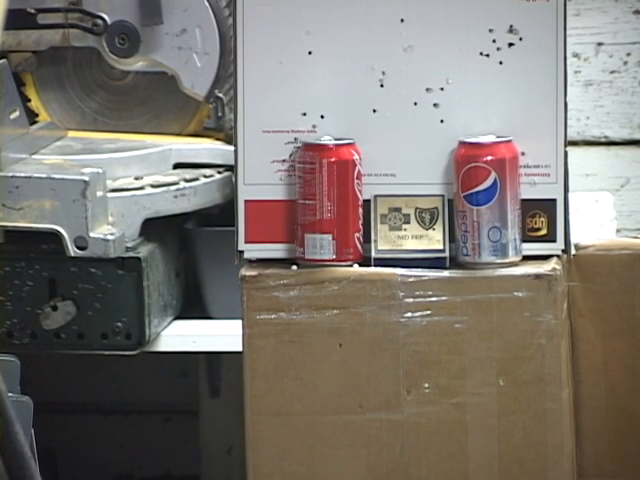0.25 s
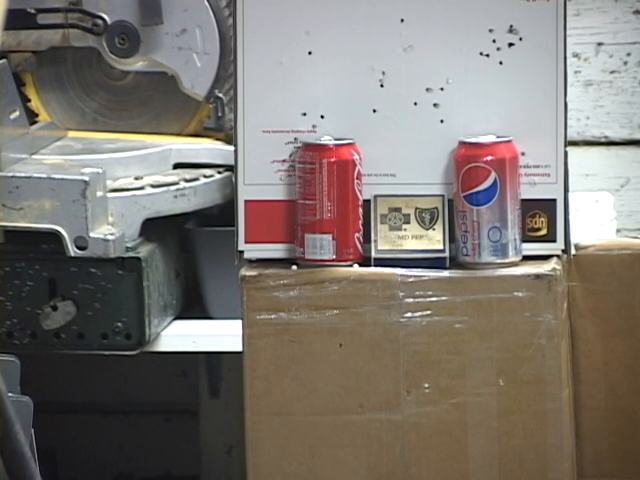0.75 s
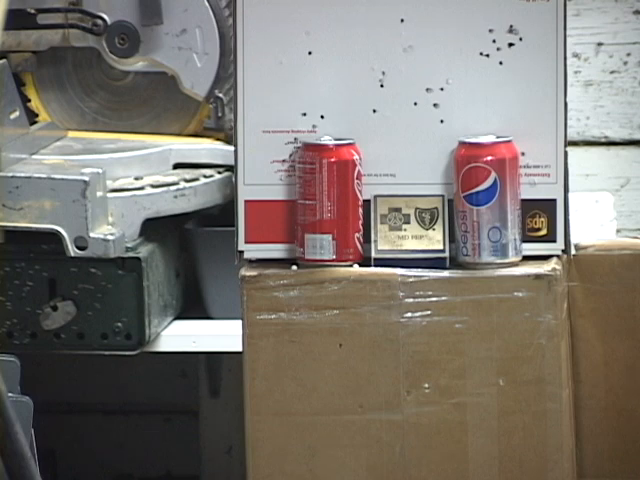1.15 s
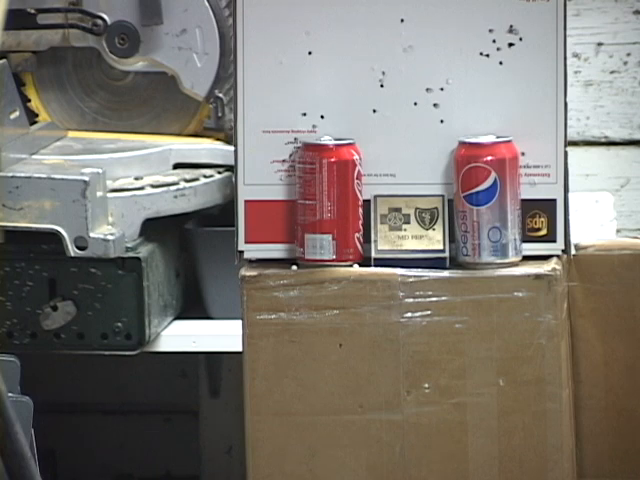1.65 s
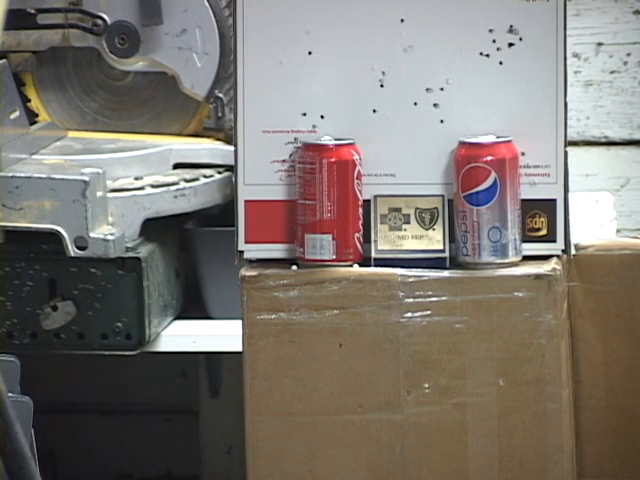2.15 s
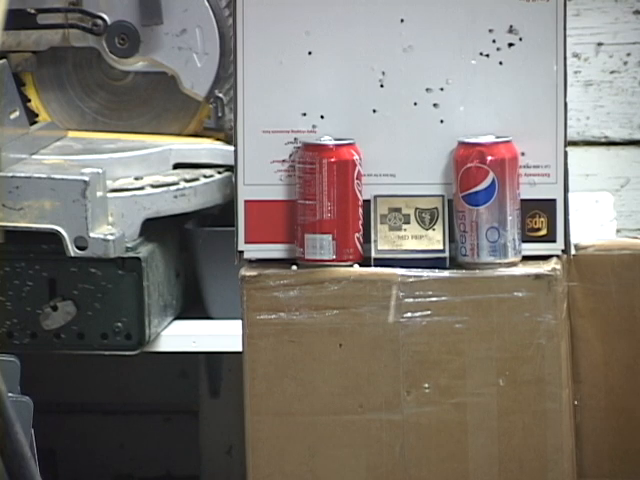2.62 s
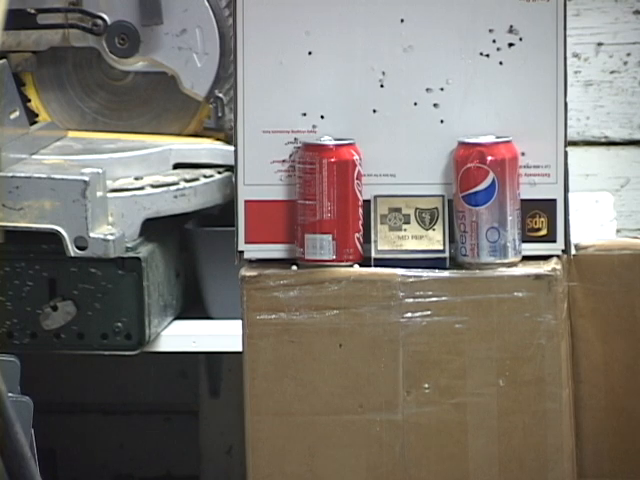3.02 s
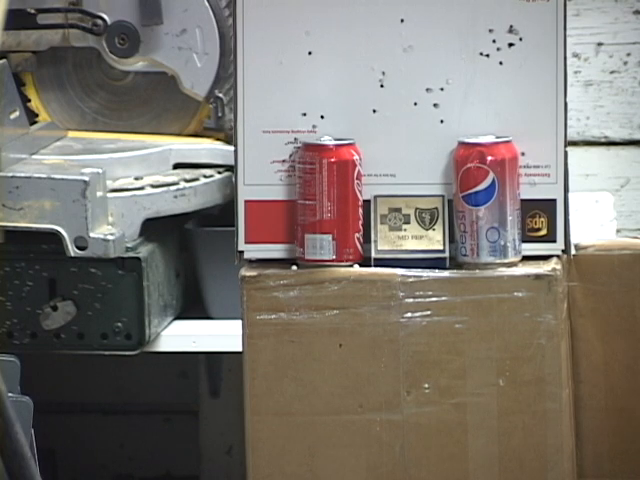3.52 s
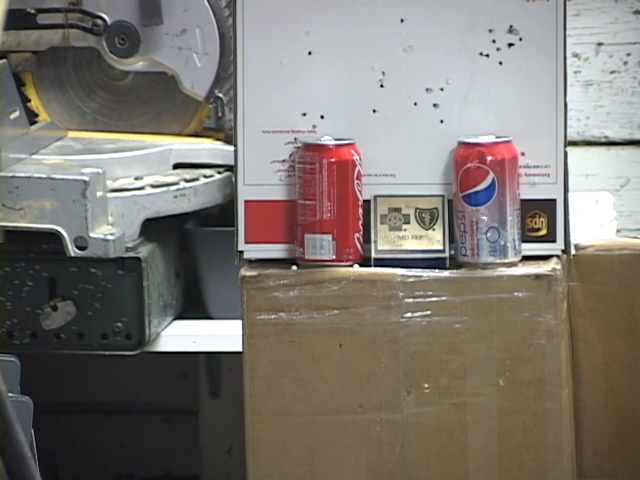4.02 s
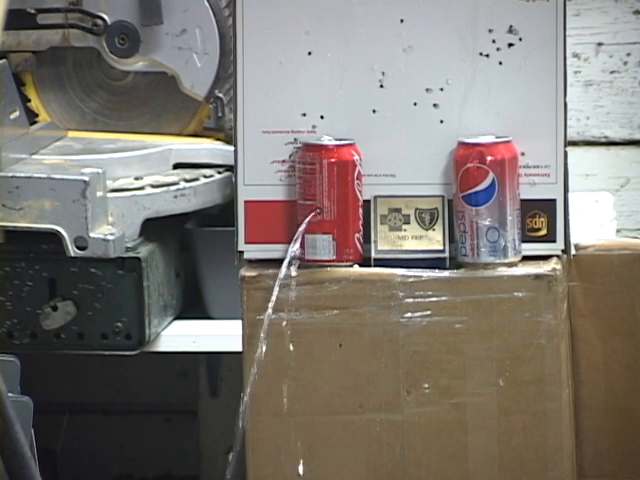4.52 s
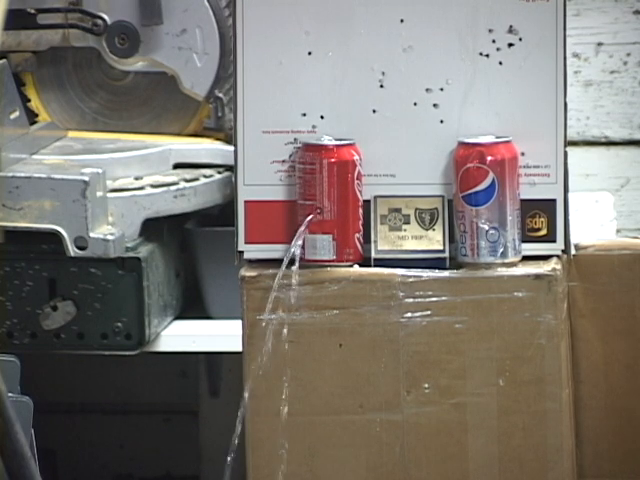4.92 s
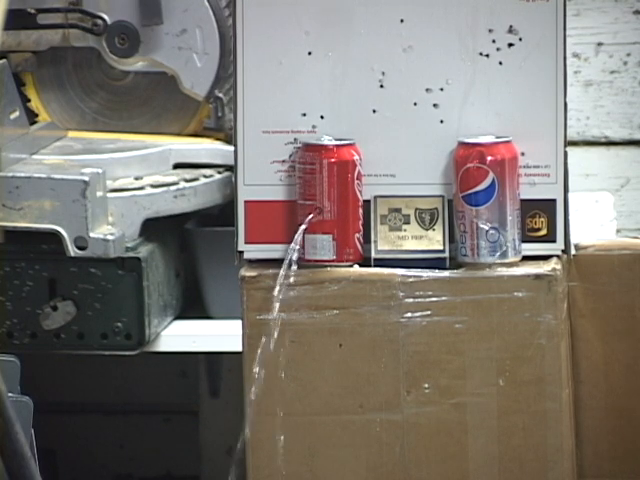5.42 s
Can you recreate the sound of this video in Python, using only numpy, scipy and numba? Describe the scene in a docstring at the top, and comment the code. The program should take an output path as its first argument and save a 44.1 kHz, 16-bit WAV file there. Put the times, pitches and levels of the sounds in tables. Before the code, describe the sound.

Two loud, sharp airsoft shots crack close to the microphone, each with an almost instant pellet hit and a slight metallic ring. After each one, the plastic pump grip slides and clacks to cock the gun. Small handling clicks and bouncing pellets fall in between, and a punctured drink can patters very softly after the second shot. A faint cricket and low hum sit under the short garage echo.

```python
"""Two sharp airsoft shots in a garage, with plastic clacks and scrapes as the pump grip slides back and forth.
In each shot the spring piston slams home, the barrel's air and nearby sheet metal ring, and the pellet
smacks the target. Hands tick on the gun, spent pellets bounce, a holed can spurts, and a cricket chirps
over a low hum. The nearby camera's limiter holds the loudest bangs level while the room dies away."""
import sys
import numpy as np
from scipy import signal
from scipy.fft import rfft, irfft, next_fast_len
from scipy.io import wavfile
from scipy.ndimage import uniform_filter1d, map_coordinates
from numba import njit

SR = 44100
rng = np.random.default_rng(int(sys.argv[2]) if len(sys.argv) > 2 else 0)


def materialize(psi):
    """Save the field psi as 16-bit PCM at rate SR to the path in sys.argv[1].

    A 1-D psi becomes a single channel; in a 2-D psi each row is a channel.
    """
    bounded = np.clip(np.atleast_2d(psi).T, -1, 1)
    quanta = np.round(bounded * 32767).astype(np.int16)
    wavfile.write(sys.argv[1], SR, quanta)


N = 249606

# Diffuse sound at the two microphones. Each row: frequency in Hz, left-right correlation.
ROOM_CORRELATION = [(60, .75), (180, .75), (550, .75), (1400, .3), (3000, -.2), (6000, 0), (15000, 0)]


def amp(db):
    return 10 ** (np.asarray(db) / 20)


def unit_rms(x):
    return x / np.sqrt(np.mean(x ** 2) + 1e-20)


def curve(points, hz):
    """Interpolates (Hz, value) points on a log axis."""
    knots_hz, values = np.transpose(points)
    return np.interp(np.log(hz + 1), np.log(knots_hz + 1), values)


def spectrum(points):
    """Gain against frequency, from (Hz, dB) points."""
    return lambda hz: amp(curve(points, hz))


def hump(centre_hz, width_oct):
    """Gaussian gain on a log frequency axis."""
    return lambda hz: np.exp(-.5 * (np.log2((hz + 1) / centre_hz) / max(width_oct, .15)) ** 2)


def uneven(colour, ripple_db=2.5):
    """Random humps about a kilohertz wide: no two knocks land alike."""
    knots = rng.standard_normal(40)
    return lambda hz: colour(hz) * amp(ripple_db * map_coordinates(knots, [hz / 700]))


def filtered(x, response):
    size = next_fast_len(x.shape[-1] + 4096)
    hz = np.fft.rfftfreq(size, 1 / SR)
    return irfft(rfft(x, size) * response(hz), size)[..., :x.shape[-1]]


def add(out, start_s, x):
    part = out[:, round(start_s * SR):][:, :x.shape[1]]
    part += x[:, :part.shape[1]]


def stereo_noise(size, correlation, colour):
    """Coloured noise with a given left-right correlation."""
    def mid_side_gain(hz):
        angle = np.arccos(np.clip(curve(correlation, hz), -1, 1)) / 2
        return colour(hz) * [np.cos(angle), np.sin(angle)]
    mid, side = filtered(rng.standard_normal((2, size)), mid_side_gain)
    return np.array([mid + side, mid - side])


def room_tail(colour):
    """Garage echoes, duller on top: each band dies at its own rate, over a weak slow tail."""
    # Room decay. Each row: frequency in Hz, T60 in seconds, share of the slow tail in dB.
    decay = [(100, 0.069, -20.5), (596, 0.23, -28.5), (1350, 0.24, -31), (5000, 0.23, -57),
             (12600, 0.21, -55)]
    slow_t60_s, build_s = 1, .0027
    noise = stereo_noise(SR * 3 // 5, ROOM_CORRELATION, lambda hz: colour(hz) / (1 + (hz / 13000) ** 4))
    hz, t, bands = signal.stft(noise, SR, nperseg=256)
    t60_s, slow_db = (curve(np.array(decay)[:, [0, k]], hz)[:, None] for k in (1, 2))
    envelope = amp(-60 * t / t60_s) + amp(slow_db - 60 * t / slow_t60_s)
    tail = signal.istft(bands * envelope, SR, nperseg=256)[1]
    tail *= 1 - np.exp(-np.arange(tail.shape[1]) / SR / build_s)  # echoes thicken
    return amp([[.6], [-.6]]) * tail / np.sqrt(np.sum(tail ** 2) / 2)


def direct(x, pan, lag_samples=5):
    """Straight path, later on the right. Positive pan is left; the camera body shades treble more."""
    both = np.array([np.pad(x, (0, lag_samples)), np.pad(x, (lag_samples, 0))])
    return filtered(both, lambda hz: amp(np.array([[.5], [-.5]]) * pan * (1.82 + hz / 14000)))


def in_garage(x, wet_db, pan=0):
    """A lasting sound, direct and through the room."""
    out = amp(wet_db) * signal.fftconvolve(x[None], room_tail(np.ones_like), axes=1)
    add(out, 0, direct(x, pan))
    return out


def strike(colour, rise_s, t60_s, wet_db, pan=0):
    """A blow: milliseconds of noise, and the room's answer in the same colour."""
    t = np.arange(SR // 10) / SR
    noise = unit_rms(filtered(rng.standard_normal(len(t)), colour))
    crack = noise * (1 - np.exp(-t / rise_s)) * amp(-60 * t / t60_s)
    out = amp(wet_db) * np.linalg.norm(crack) * room_tail(colour)
    add(out, 0, direct(crack, pan))
    return out


def ring(modes, attack_s, drift_cycles):
    """Damped modes of slightly random strength; phases wander by about drift_cycles in a second."""
    t = np.arange(SR) / SR
    drifts = np.cumsum(rng.standard_normal((len(modes), SR)), axis=1) * drift_cycles / np.sqrt(SR)
    out = np.zeros(SR)
    for (hz, db, t60_s), drift in zip(modes, drifts):
        envelope = amp(db + rng.normal(0, 1) - 60 * t / t60_s)
        out += envelope * np.sin(2 * np.pi * (hz * t + rng.random() + drift))
    return out * (1 - np.exp(-t / attack_s))


def hum():
    """A wavering rumble, stronger on the right, and the murmur of room air with microphone hiss."""
    # Background spectrum. Each row: frequency in Hz, relative density in dB.
    density = [(12, -34), (20, -21), (61, -2), (148, -17.5), (180, -13.5), (213, -21), (427, -22),
               (580, -27.5), (648, -27), (833, -31), (1160, -30.5), (1820, -38.5), (15500, -43.5)]
    # Its stereo image. Each row: frequency in Hz, left-right correlation.
    correlation = [(60, 0.96), (180, 0.67), (550, 0.24), (1650, 0.17), (4970, 0.047), (15000, 0.02)]
    rumble_db, air_db, split_hz = -51, -57.5, 250
    colour = spectrum(density)
    waver_db = map_coordinates(rng.standard_normal(60), [np.arange(N) * 7 / SR])
    rumble = unit_rms(stereo_noise(N, correlation, lambda hz: colour(hz) * (hz < split_hz)))
    air = unit_rms(stereo_noise(N, correlation, lambda hz: colour(hz) * (hz >= split_hz)))
    return amp(rumble_db + waver_db + np.array([[-1.3], [1.3]])) * rumble + amp(air_db) * air


def cloth():
    """Moving cloth rustles in soft swells."""
    # Each row: middle in seconds, half width in seconds, level in dB.
    swells = [(.05, 0.14, -63.5), (.3, 0.064, -59), (.6, .04, -62)]
    t = np.arange(N) / SR
    envelope = sum(amp(db) * np.exp(-.5 * ((t - mid_s) / half_s) ** 2) for mid_s, half_s, db in swells)
    return envelope * unit_rms(stereo_noise(N, ROOM_CORRELATION, hump(1600, 1.4)))


def cricket():
    """Three wing strokes a chirp, each a short tone that rises and falls a little."""
    # Each row: start in seconds, level in dB.
    chirps = [(.865, -60), (1.228, -56), (1.648, -56), (2.052, -56), (2.96, -64), (4.93, -62)]
    wing_hz, stroke_s, period_s = 4400, .034, .05
    out = np.zeros((2, N))
    t = np.arange(round(stroke_s * SR)) / SR
    for start_s, db in chirps:
        for k in range(3):
            pitch_hz = wing_hz * (1 + rng.normal(0, .012) - 110 * (t - .018) ** 2)
            tone = np.hanning(len(t)) * np.sin(2 * np.pi * np.cumsum(pitch_hz) / SR)
            add(out, start_s + period_s * k, amp(db + rng.normal(0, 1.2)) * in_garage(tone, wet_db=-15))
    return out


def can_spurt():
    """Drink spurts from the holed can: a thin patter of drops that swells, then slackens."""
    start_s, rise_s, level_db, sag_db_per_s = 4.25, .53, -54.5, 2.5
    drops = rng.standard_normal((2, N)) * (.5 + 2.5 * (rng.random(N) < .004))  # spikes on soft noise
    t = np.clip(np.arange(N) / SR - start_s, 0, None)
    flow = np.clip(t / rise_s, 0, 1) ** 2 * amp(level_db - sag_db_per_s * t)
    return flow * unit_rms(filtered(drops, hump(3000, 1.8)))


def faint_pings():
    """Single modes ring briefly."""
    # Each row: start in seconds, frequency in Hz, level in dB, T60 in seconds.
    pings = [(.535, 5700, -52, .06), (4.712, 1600, -43, .06), (4.722, 3180, -45, .08),
             (4.724, 850, -47, .13)]
    out = np.zeros((2, N))
    for start_s, *mode in pings:
        add(out, start_s, in_garage(ring([mode], attack_s=.005, drift_cycles=1.5), wet_db=-5))
    return out


def hollow_knock(start_s=2.861):
    """Something hollow rings once."""
    # Each row: frequency in Hz, level in dB, T60 in seconds.
    modes = [(335, -42, .16), (645, -42, .22), (760, -45, .14), (955, -46, .15), (1200, -44, .13)]
    out = np.zeros((2, N))
    add(out, start_s, in_garage(ring(modes, attack_s=.0023, drift_cycles=1.3), wet_db=-.5))
    return out


def spent_pellets():
    """Far bounces, mostly room sound; they lose their top on the way round corners."""
    # Each row: start in seconds, level in dB, centre in Hz, width in octaves.
    bounces = [(1.584, -56.5, 2000, .9), (2.645, -49.5, 5210, 0.77), (2.862, -45.5, 5000, 1),
               (2.958, -45, 4800, .6), (3.601, -34, 3610, 0.67), (3.6926, -32, 4860, 0.84),
               (4.474, -48, 5080, 0.65), (4.702, -50, 3500, .8), (4.769, -34.5, 5840, 0.68),
               (4.875, -47.5, 8070, 0.62), (4.977, -33, 6800, 1), (4.994, -32.5, 5500, .53),
               (5.088, -31.5, 3300, .5), (5.1895, -40.5, 5430, 0.27)]
    click_hz, click_db, top_hz = 9630, -15, 10600  # click: the plastic pellet's own sound
    out = np.zeros((2, N))
    for start_s, db, centre_hz, width_oct in bounces:
        surface, click = hump(centre_hz, width_oct), hump(click_hz, .2)
        colour = uneven(lambda hz: (surface(hz) + amp(click_db) * click(hz)) / (1 + (hz / top_hz) ** 8))
        add(out, start_s, amp(db) * strike(colour, rise_s=.0018, t60_s=.021, wet_db=14, pan=-6))
    return out


def handling():
    """Trigger and hands tick on the gun, each a short crack around its own pitch."""
    # Each row: start in seconds, level in dB, centre in Hz, width in octaves, pan.
    ticks = [(.049, -46.5, 1210, 0.65, 8), (0.1277, -47, 580, .55, 15), (0.379, -48.5, 2950, 0.88, 5),
             (.402, -50, 587, 0.44, 15), (.58, -53, 1900, 0.49, -4), (2.2606, -23.5, 4170, 1.65, 9.5),
             (2.861, -30.5, 720, 0.61, 1), (3.08, -34.5, 1970, 0.89, 6.5), (3.11, -29, 1300, 1.23, 3.5),
             (3.131, -31.5, 2500, 0.56, -0.5), (3.3185, -25, 1900, .8, 7.5), (3.873, -36, 2037, 1.02, 1.5),
             (3.931, -43, 1770, 0.66, 1), (3.97, -42, 1445, 0.74, 1), (4.089, -35, 2040, 0.75, 3),
             (4.45, -35.5, 547, .27, -1), (5.215, -44, 1006, 1.1, 12.5), (5.53, -30, 1490, 1, 7.5)]
    out = np.zeros((2, N))
    for start_s, db, centre_hz, width_oct, pan in ticks:
        colour = uneven(hump(centre_hz, width_oct))
        add(out, start_s, amp(db) * strike(colour, rise_s=.001, t60_s=.022, wet_db=4.5, pan=pan))
    return out


def pump_clacks(plastic):
    """Pump parts knock; the stock thuds with one low push that does not ring."""
    # Each row: start in seconds, clack level in dB, thud level in dB.
    clacks = [(3.1421, -6, -25.5), (3.148, 2.5, -18), (3.193, -1.5, -47), (3.2053, 5, -18.5),
              (3.2253, -4, -35), (3.3479, -12.5, -54), (3.4024, -10.5, -44), (3.412, 1.5, -28.5),
              (3.4188, 14, -17.5), (3.4257, 0.5, -32), (5.2857, -0.5, -27.5), (5.3681, 0.5, -17),
              (5.3746, 2, -27.5), (5.636, 1, -38), (5.6429, 12.5, -31), (5.6494, -10, -28)]
    out = np.zeros((2, N))
    t = np.arange(SR // 10) / SR
    push = np.sin(np.pi * np.clip(t / .0015, 0, .5)) * (1 - t / .015) * np.exp(-t / .0082)
    for start_s, db, thud_db in clacks:
        add(out, start_s, amp(db) * strike(uneven(plastic), rise_s=.002, t60_s=.016, wet_db=1, pan=4))
        add(out, start_s, -amp(thud_db) * direct(push, pan=5.5))
    return out


def grip_slides(plastic):
    """The grip scrapes along the tube, free up to the catch, then against the spring."""
    # Each row: start, full speed and stop in seconds; start level, full level and scrape over hiss in dB.
    strokes = [(3.121, 3.136, 3.15, -60.5, -38, 6), (3.146, 3.194, 3.207, -34.5, -28, -5),
               (3.341, 3.376, 3.418, -39, -31, -2), (5.241, 5.282, 5.288, -63, -35, 0.5),
               (5.287, 5.333, 5.368, -42, -29.5, -6), (5.53, 5.599, 5.637, -52.5, -34.5, -2)]
    # Resonances of the dull scrape. Each row: centre in Hz, width in Hz, relative gain in dB.
    resonances = [(746, 600, 8), (1293, 210, 5.5)]

    def resonant(hz):
        return sum(amp(db) * 1j * hz * width_hz / (centre_hz ** 2 - hz ** 2 + 1j * hz * width_hz)
                   for centre_hz, width_hz, db in resonances)
    out = np.zeros((2, N))
    for start_s, full_s, stop_s, start_db, full_db, scrape_db in strokes:
        t = np.arange(start_s, stop_s, 1 / SR)
        noise = rng.standard_normal((2, len(t)))
        roughness_db = 2 * unit_rms(uniform_filter1d(rng.standard_normal(len(t)), size=60))
        grit = noise * amp(roughness_db)
        hiss = unit_rms(filtered(grit[0], lambda hz: plastic(hz) * (hz > 2200)))
        scrape = amp(scrape_db) * unit_rms(filtered(grit[1], resonant))
        swell = amp(np.interp(t, [start_s, full_s], [start_db, full_db]))
        rub = swell * (hiss + scrape) * signal.windows.tukey(len(t), .2)
        add(out, start_s, in_garage(rub, wet_db=2.5, pan=4.5))
    return out


def pump(spring_start_s=3.421, spring_db=-42):
    """The plastic action clacks and slides; the cocked spring rings once."""
    # Spectrum of the plastic. Each row: frequency in Hz, relative density in dB.
    density = [(150, -24.5), (250, -16), (1360, -5.5), (2050, -4), (2320, -5.5), (2570, -3.5), (4030, -5),
               (4620, 0), (7110, -3), (8900, -4.5), (15500, -24)]
    # Each row: frequency in Hz, relative level in dB, T60 in seconds.
    spring_modes = [(780, -5, 1.1), (1130, -8, 1.0), (1351, -5, 1.0), (5373, -6, .5), (6697, -1.5, 1.0),
                    (8460, -6, .5)]
    plastic = spectrum(density)
    out = pump_clacks(plastic) + grip_slides(plastic)
    spring = ring(spring_modes, attack_s=.003, drift_cycles=.8)
    add(out, spring_start_s, amp(spring_db) * in_garage(spring, wet_db=-6))
    return out


def gunshots():
    """The piston slams home, the barrel's air rings, nearby metal shakes, then the pellet lands."""
    # Each row: start in seconds, blow level in dB, pellet flight in seconds, hit level in dB.
    shots = [(2.2918, 20, .0745, 4.5), (4.159, 18, .078, 3.5)]
    # Spectrum of blow and hit. Each row: frequency in Hz, relative density in dB.
    density = [(40, -48.5), (120, -24.5), (200, -17), (350, -13), (700, -11), (1300, -10), (2300, -4.5),
               (3500, -7), (5500, -3.5), (9000, -10.5), (12000, -15.5), (15500, -30)]
    # Air in barrel and cylinder. Each row: frequency in Hz, relative level in dB, T60 in seconds.
    barrel_modes = [(201, -15, 0.11), (495.5, -15, 0.092), (557.6, -11, 0.11), (656, -10.5, 0.15),
                    (761.5, -0.5, .09), (794.4, -6, 0.18), (854, -10, 0.16), (2335, -4.5, 0.13),
                    (5540, -10, 0.14)]
    # Sheet metal nearby, same columns.
    sheet_modes = [(526, 0, 1), (582, -2.5, 1), (815, -7.5, .55), (953, -1.5, 0.84), (1200, 2.5, 0.51),
                   (1270, -0.5, 0.92), (1733, -11, .5), (1830, -7.5, 0.465)]
    colour = spectrum(density)
    out = np.zeros((2, N))
    for start_s, db, flight_s, hit_db in shots:
        add(out, start_s, amp(db) * strike(colour, rise_s=.00011, t60_s=.02, wet_db=-.5, pan=4.5))
        barrel = ring(barrel_modes, attack_s=.0021, drift_cycles=1)
        add(out, start_s + .00291, amp(db - 8.5) * in_garage(barrel, wet_db=-21.5))
        sheet = ring(sheet_modes, attack_s=.02, drift_cycles=.95)
        add(out, start_s + .003, amp(db - 57.5) * in_garage(sheet, wet_db=-3))
        add(out, start_s + flight_s, amp(hit_db) * strike(colour, rise_s=.00048, t60_s=.01, wet_db=10.5))
    return out


def scene():
    """All sources at the two microphones."""
    return (gunshots() + pump() + handling() + spent_pellets() + hollow_knock() + faint_pings()
            + cricket() + can_spurt() + hum() + cloth())


@njit
def follow(level, attack_s, release_s):
    """The limiter's envelope follower."""
    out, held = np.empty_like(level), 0.0
    for i in range(len(level)):
        held += (level[i] - held) / (SR * (attack_s if level[i] > held else release_s))
        out[i] = held
    return out


def record(dry):
    """One limiter for both channels, whose gain swing leaks as a slow thump; soft clip; band limit."""
    threshold_db, leak_hz, leak_top_hz, top_hz = -2.5, 3.6, 18, 15620

    def leak_path(hz):
        highpass = -hz ** 2 / (leak_hz ** 2 - hz ** 2 + 4j * hz)
        return highpass / (1 + 1j * hz / leak_top_hz)
    drive = follow(np.abs(dry).max(0), attack_s=.0011, release_s=.013) / amp(threshold_db)
    gain = (1 + drive ** 2.42) ** (-1 / 2.55)
    thump = amp([[-21], [-25]]) * filtered(gain - 1, leak_path)
    limited = dry * gain + thump
    clipped = .96 * limited / (1 + np.abs(limited) ** 8) ** (1 / 8)
    return np.clip(filtered(clipped, lambda hz: np.clip((top_hz - hz) / 150, 0, 1)), -1, 1)


dry = scene()
out = record(dry)
materialize(out)
```